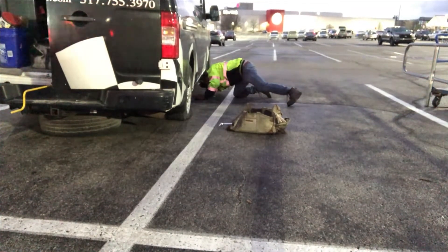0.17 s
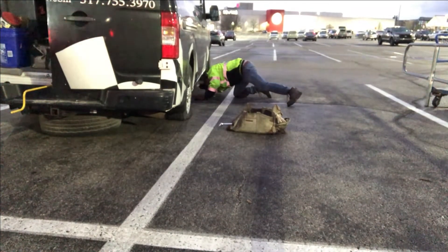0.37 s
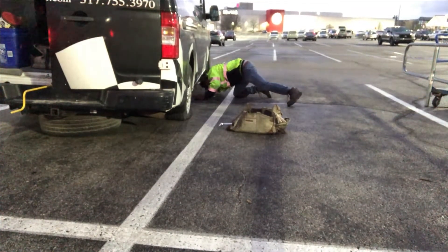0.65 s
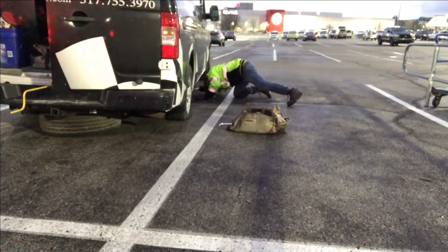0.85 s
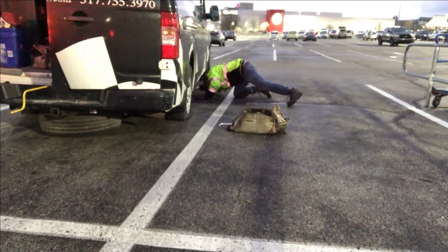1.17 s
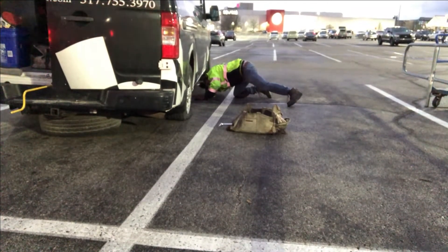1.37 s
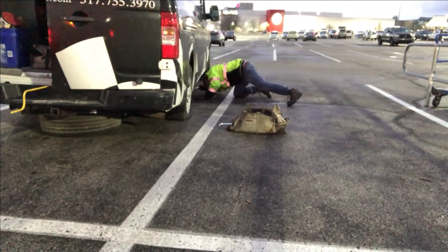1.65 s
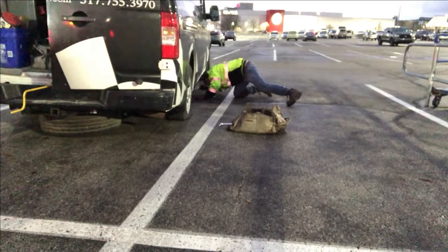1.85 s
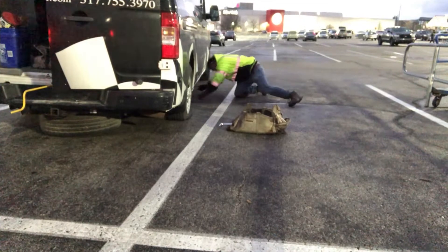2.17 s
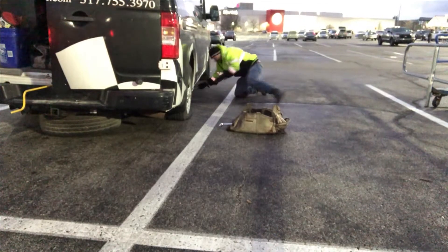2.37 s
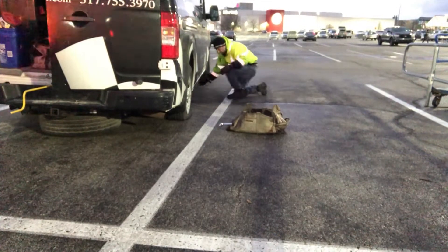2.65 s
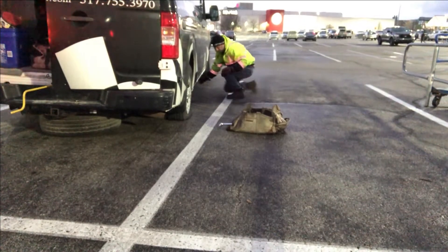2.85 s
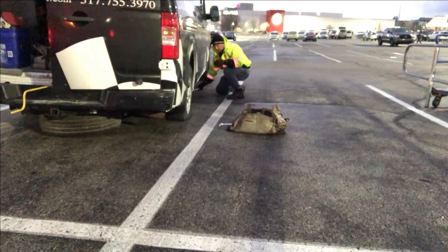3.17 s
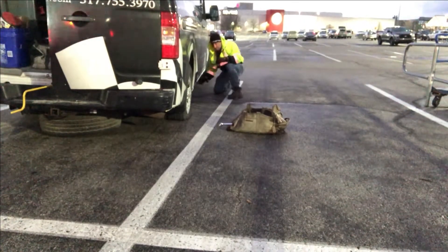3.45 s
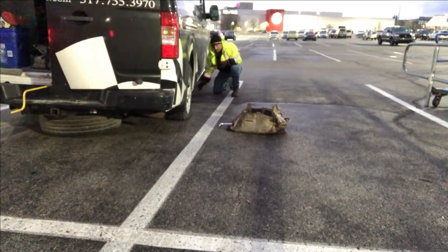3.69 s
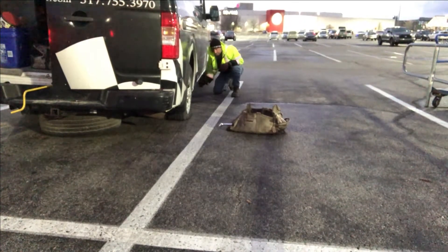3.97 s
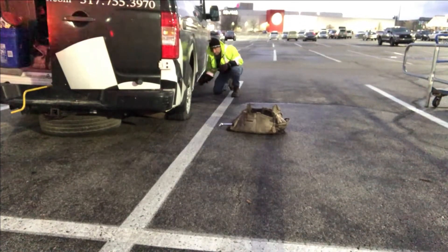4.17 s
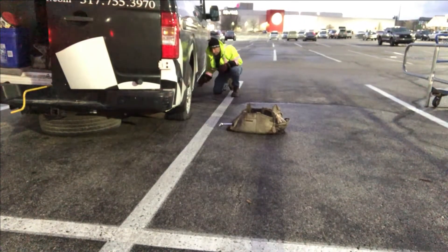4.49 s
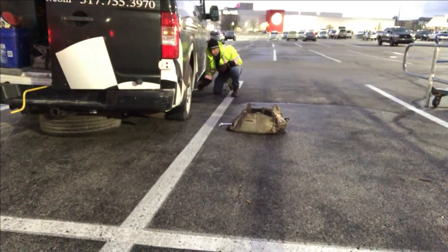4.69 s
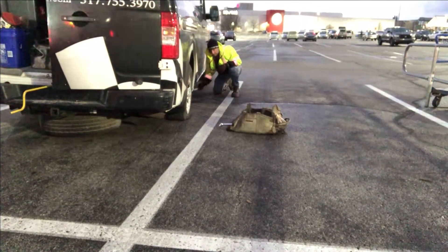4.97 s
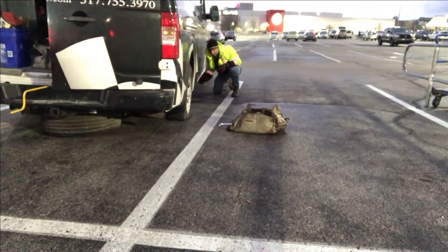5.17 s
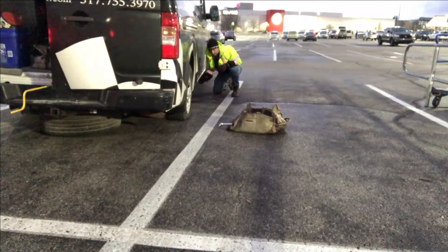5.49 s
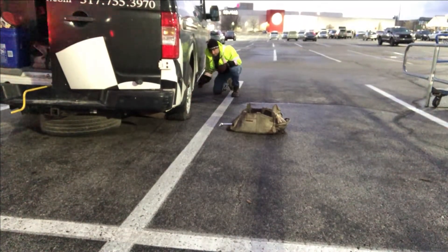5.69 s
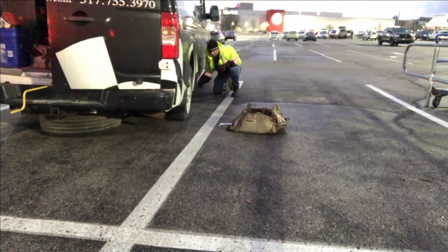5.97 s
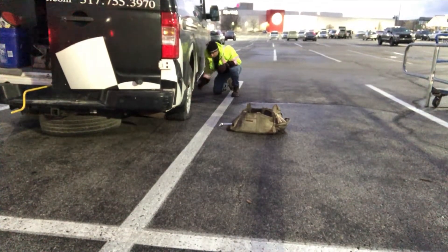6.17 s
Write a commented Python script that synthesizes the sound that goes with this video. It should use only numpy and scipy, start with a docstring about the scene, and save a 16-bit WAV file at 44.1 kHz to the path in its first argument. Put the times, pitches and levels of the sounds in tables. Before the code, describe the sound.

In an open parking lot, a hydraulic floor jack is pumped under a van. Quick light strokes scrape and clack the steel handle, with one loud thump near the start. Shoes scuff and clothes rustle amid a few clinks and knocks. Then heavy, rattling knocks come about three a second. Wind rumbles on the microphone over faint traffic; the sound is left channel only, slightly overdriven, with brief dropouts.

```python
"""Open car park: a hydraulic floor jack is pumped under a van, over wind and distant traffic.
Quick idle strokes scrape and clack the steel handle. The worker shuffles into a crouch, then full
strokes knock the handle against its stop, three a second, ringing jack and van body.
One overdriven microphone feeds the left channel; the recorder stutters in short dropouts."""
import sys
import numpy as np
from scipy import signal
from scipy.fft import rfft, irfft, next_fast_len
from scipy.io import wavfile
from scipy.ndimage import uniform_filter1d

SR = 44100
rng = np.random.default_rng(int(sys.argv[2]) if len(sys.argv) > 2 else 0)


def wav_record(signal):
    """Record a signal, one row per channel, as 16-bit PCM in the file named by sys.argv[1]."""
    frames = np.transpose(np.atleast_2d(signal))
    bounded = np.clip(frames, -1, 1)
    # unit amplitude maps onto the largest positive 16-bit level
    quanta = np.round(bounded * 32767).astype(np.int16)
    wavfile.write(sys.argv[1], SR, quanta)


N = 279153


def amp(db):
    """Decibels to gain."""
    return 10 ** (np.asarray(db) / 20)


def unit(x):
    """Scale to rms 1."""
    return x / np.sqrt(np.mean(x ** 2) + 1e-20)


def along(points, hz):
    """Interpolate (freq_hz, value) points on a log axis."""
    freqs_hz, values = np.transpose(points)
    return np.interp(np.log(hz + 1), np.log(freqs_hz + 1), values)


def wobble(rate_hz):
    """Smooth random curve, rate_hz knots a second."""
    knots = rng.standard_normal(int(N * rate_hz / SR) + 4)
    fine = signal.resample_poly(knots, up=8, down=1)
    return np.interp(np.arange(N) * rate_hz / SR, np.arange(len(fine)) / 8, fine)


def filtered(x, response):
    """Apply the gain response(hz)."""
    n = x.shape[-1]
    padded = next_fast_len(n + 8192)
    return irfft(rfft(x, padded) * response(np.fft.rfftfreq(padded, 1 / SR)), padded)[..., :n]


def coloured(x, colour):
    """Shape by (freq_hz, level_db) points; rms 1."""
    return unit(filtered(x, lambda hz: amp(along(colour, hz))))


def noise(colour, size=N):
    """Coloured noise, rms 1."""
    return coloured(rng.standard_normal(size), colour)


def grit(rough_db):
    """Dense micro-impacts of uneven strength."""
    return rng.standard_normal(N) * amp(rough_db * wobble(400))


def dying(x, decay):
    """Fade each band by (freq_hz, t60_s) points."""
    hz, t, bands = signal.stft(x, SR, nperseg=256)
    fade = amp(-60 * t / along(decay, hz)[:, None])
    return signal.istft(bands * fade, SR, nperseg=256)[1][:len(x)]


def add(track, start_s, sound):
    """Mix sound into track at start_s."""
    i = round(start_s * SR)
    part = sound[max(-i, 0):N - i]
    track[max(i, 0):max(i, 0) + len(part)] += part


def wind():
    """Steady, lumpy rumble of air on the microphone."""
    # wind spectrum: freq_hz, level_db
    colour = [(15, 3), (40, 1), (100, -3), (165, -10), (250, -18.5), (400, -32), (1000, -68), (16000, -120)]
    return amp(-37.5 + 1.04 * wobble(1.6) + 1.5 * wobble(13)) * noise(colour)


def traffic():
    """Steady distant traffic hum, with the background louder at the start and around the scuffs."""
    # traffic spectrum: freq_hz, level_db
    colour = [(60, -3), (230, 1.5), (410, -3.5), (520, -3.5), (900, -7), (1500, -19), (2200, -24.5),
              (3100, -27), (4500, -33), (9000, -43), (16000, -62)]
    # background loudness: time_s, level_db
    contour = [(0, -46), (.6, -50), (1.1, -53.5), (2.6, -44), (3.8, -52), (6.33, -53)]
    level_db = np.interp(np.arange(N) / SR, *np.transpose(contour))
    return amp(level_db + 1.2 * wobble(3.88)) * noise(colour)


def car_park(x, echo_s, echo_db, tail_db, lowpass_hz):
    """A distant wall slaps back; parked cars scatter a faint tail."""
    # open-air decay: freq_hz, t60_s
    decay = [(100, 2), (700, 0.97), (3000, 0.73), (6000, .9), (14000, .5)]
    t = np.arange(SR) / SR
    tail = dying(rng.standard_normal(SR), decay)
    slap = rng.standard_normal(SR) * (t > echo_s) * np.exp(-abs(t - echo_s) / 0.0095)
    impulse = amp(tail_db) * tail / np.linalg.norm(tail) + amp(echo_db) * slap / np.linalg.norm(slap)
    reflected = signal.fftconvolve(x, impulse)[:N]
    return filtered(reflected, lambda hz: hz / np.hypot(hz, 400) / np.hypot(1, hz / lowpass_hz))


def dragged(pushes, colour, rough_db):
    """Gritty rubbing swells with each push, catching and letting go."""
    envelope, t = np.zeros(N), np.arange(SR) / SR - .5
    from_peak_s = np.hypot(t, 0.007) - 0.007  # rounds the peak
    for peak_s, level_db, rise_t60_s, fall_t60_s in pushes:
        t60_s = np.where(t < 0, rise_t60_s, fall_t60_s)
        add(envelope, peak_s - .5, amp(level_db - 60 * from_peak_s / t60_s))
    catching = unit(amp(2.8 * wobble(60)))
    return envelope * catching * coloured(grit(rough_db), colour)


def rustles():
    """Work clothes rub as the worker moves."""
    # cloth movements: peak_s, level_db, rise_t60_s
    moves = [(2.54, -46, 0.26), (2.735, -47.5, 0.07), (2.85, -53, 1.8), (3.6, -46, .25),
             (4.98, -57.5, 1.44), (6.05, -61.5, 0.45)]
    # cloth spectrum: freq_hz, level_db
    colour = [(200, -28), (900, 2.5), (2500, -1.5), (4600, -2.5), (6500, -11), (10000, -21), (16000, -39)]
    pushes = [(s, db, rise_t60_s, 1.15 * rise_t60_s) for s, db, rise_t60_s in moves]
    return dragged(pushes, colour, rough_db=0.5)


def scuffs(fall_t60_s=0.2):
    """Soles and knees drag dully over asphalt."""
    # drags: peak_s, level_db, rise_t60_s
    drags = [(2.02, -44, 0.64), (2.375, -44, 0.06), (2.413, -32.5, 0.07), (2.502, -39.5, 0.66),
             (2.598, -25.5, 0.13), (3.57, -31, .09)]
    # scuff spectrum: freq_hz, level_db
    colour = [(60, -6.5), (200, -5.5), (350, -1.5), (650, -5.5), (1000, -28.5), (2500, -25), (8000, -52.5),
              (16000, -65)]
    return dragged([(*drag, fall_t60_s) for drag in drags], colour, rough_db=4.5)


def weight_shifts(width_s=.007):
    """Weight lands on a foot or the handle: one deep pulse, no ring."""
    # pushes: peak_s, level_db
    pushes = [(2.338, -20.5), (2.388, -29), (4.223, -28)]
    out, u = np.zeros(N), (np.arange(SR // 5) / SR - .1) / width_s
    pulse = (1 - u * u) * np.exp(-u * u / 2)
    for peak_s, level_db in pushes:
        add(out, peak_s - .1, amp(level_db) * pulse)
    return out


def clinks(t60_s=0.13):
    """Loose linkage parts ring in short, rough notes."""
    # steel notes: start_s, pitch_hz, level_db
    notes = [(2.4, 3130, -30.5), (2.399, 3880, -31.5), (3.128, 1890, -28), (3.127, 2770, -30),
             (3.247, 2800, -32.5), (3.69, 2755, -37)]
    out, t = np.zeros(N), np.arange(SR // 4) / SR
    envelope = (1 - np.exp(-t / 0.0018)) * 1000 ** (-t / t60_s)
    for start_s, pitch_hz, level_db in notes:
        chatter_rad = 0.055 * np.cumsum(rng.standard_normal(len(t)))
        add(out, start_s, amp(level_db) * envelope * np.sin(2 * np.pi * pitch_hz * t + chatter_rad))
    return out


def chassis(force, sway_db=3, sway_hz=9):
    """The jack's steel frame rings; each mode swells and fades as the contact moves."""
    # frame modes before sharpening: pitch_hz, width_hz, level_db
    modes = [(602, 68, 0.5), (1235, 57, -2.5), (1632, 22, -3.5), (1721, 33, 1.5), (1960, 49, 0),
             (2106, 23, 1.5), (2780, 72, -2.5), (3086, 43, -1.5), (3700, 130, -12.5), (4430, 85, -6.5),
             (5850, 57, -13)]
    ring = np.zeros(N)
    for pitch_hz, width_hz, level_db in modes:
        def sharpened(hz):
            mode = amp(level_db) * 1j * hz * width_hz / (pitch_hz ** 2 - hz ** 2 + 1j * hz * width_hz)
            return mode * abs(mode) ** 0.42
        ring += filtered(force, sharpened) * amp(sway_db * wobble(sway_hz))
    return unit(ring)


def friction(contacts, colour, ring_db, rough_db, treble_t60_ratio):
    """Steel rubs on steel: each contact builds, then fades, treble first."""
    ring = chassis(grit(rough_db))
    direct = coloured(grit(rough_db), colour)
    rub = unit(direct + amp(ring_db) * ring)
    treble = filtered(rub, lambda hz: 1 - 1 / (1 + (hz / 3800) ** 4))
    body_gain, treble_gain, t = np.zeros(N), np.zeros(N), np.arange(SR // 2) / SR
    for start_s, level_db, rise_s, t60_s, treble_db in contacts:
        build = np.minimum(t / rise_s, 1) ** 0.48
        fade = 1000 ** (-np.maximum(t - rise_s, 0) / t60_s)
        add(body_gain, start_s, amp(level_db) * build * fade)
        add(treble_gain, start_s, amp(level_db + treble_db) * build * fade ** (1 / treble_t60_ratio))
    return body_gain * (rub - treble) + treble_gain * treble


def idle_strokes(tap_rise_s=0.0021):
    """The handle taps, catches and slides; the linkage clacks at the turn or when jolted."""
    # handle strokes: slide_s, slide_db, take_up_s, travel_s, clack_db
    strokes = [(0.05, -28, 0.059, 0.09, -23.5), (.484, -31, 0.082, .074, -23.5),
               (.872, -29, 0.074, .082, -27), (1.25, -28.5, 0.06, 0.082, -25.5),
               (1.6, -26, 0.048, 0.082, -26.5), (1.916, -25.5, 0.0498, .093, -27),
               (3.551, -31.5, 0.041, 0.14, -36), (4.081, -39.5, 0.097, 0.056, -46.5)]
    # stray taps of the handle in its socket: start_s, level_db, t60_s
    stray_taps = [(.396, -45, 0.081), (2.063, -21.5, .028), (3.362, -44, .15), (4.031, -39, 0.25),
                  (4.666, -40, 0.18)]
    # linkage jolts as the grip changes: start_s, level_db, rise_s
    jolts = [(2.159, -39.5, 0.014), (2.4, -30.5, 0.0059), (2.495, -43.5, .03), (2.712, -35.5, 0.029),
             (3.125, -26.5, 0.0057), (3.246, -33.5, .005), (3.776, -35, 0.0038), (5.892, -45.5, 0.0035),
             (6.176, -42, .003)]
    # tap spectrum: freq_hz, level_db
    tap_colour = [(100, -16), (600, 7), (1400, 1), (2100, -9), (3200, -15.5), (5000, -34), (16000, -60)]
    # slide spectrum: freq_hz, level_db
    slide_colour = [(100, -6), (300, -3), (650, -2.5), (900, -1.5), (1800, 1), (3000, -5.5), (4500, -10.5),
                    (7000, -21.5), (10000, -32), (16000, -54)]
    # clack spectrum: freq_hz, level_db
    clack_colour = [(100, -21), (400, -7), (620, 3.5), (900, -2), (1800, -0.5), (3000, -3), (4700, -8.5),
                    (7000, -20.5), (11500, -26.5), (13000, -44), (16000, -52)]
    # contacts: start_s, level_db, rise_s, t60_s, treble_db
    taps = [(s, db, tap_rise_s, t60_s, 0) for s, db, t60_s in stray_taps]
    clacks = [(s, db, rise_s, 0.199, -3.5) for s, db, rise_s in jolts]
    slides = []
    for slide_s, slide_db, take_up_s, travel_s, clack_db in strokes:
        taps.append((slide_s - take_up_s, slide_db - 13.5, tap_rise_s, 0.21, 0))
        slides.append((slide_s - take_up_s / 2, slide_db - 8, 0.021, 0.37, 0))  # the catch
        slides.append((slide_s, slide_db, 0.014, 0.23, 1))
        clacks.append((slide_s + travel_s, clack_db, 0.0071, 0.17, 1))
    return (friction(taps, tap_colour, ring_db=-10.5, rough_db=1.5, treble_t60_ratio=0.73)
            + friction(slides, slide_colour, ring_db=-1.5, rough_db=2.6, treble_t60_ratio=0.74)
            + friction(clacks, clack_colour, ring_db=-0.5, rough_db=2.6, treble_t60_ratio=0.78))


def struck(modes, t, spread_db):
    """Damped modes, their levels varying from blow to blow."""
    partials = [amp(db) * 1000 ** (-t / t60_s) * np.sin(2 * np.pi * hz * t) for hz, db, t60_s in modes]
    return amp(spread_db * rng.standard_normal(len(modes))) @ np.array(partials)


def rattle(t, hardness_db):
    """Loose parts crack and shake; harder blows are brighter and louder."""
    # loose-part spectrum: freq_hz, level_db
    colour = [(40, -7.5), (130, 2.5), (280, 5), (550, -7.5), (900, -8), (1500, -14.5), (2000, -20.5),
              (2900, -21.5), (4200, -32.5), (6500, -34), (10000, -44), (16000, -46.5)]
    # loose-part decay: freq_hz, t60_s
    decay = [(100, .17), (500, 0.17), (2000, 0.13), (6000, 0.092), (14000, 0.057)]
    attack = np.sin(np.pi / 2 * np.minimum(t / 0.00057, 1)) ** 2
    crack = 1 + amp(-0.5) * np.exp(-t / 0.0074)
    shake = dying(noise(colour, len(t)), decay) * attack * crack
    cutoff_hz = min(9000 * 2 ** (hardness_db / 3), SR / 3)
    return amp(hardness_db - 9.5) * signal.lfilter(*signal.butter(1, cutoff_hz, fs=SR), shake)


def knocks():
    """The handle hits its stop: the body booms, loose parts rattle, the tube pings."""
    # blows: start_s, level_db, hardness_db, ping_db
    blows = [(0.257, -2.5, -2.5, -11.5), (2.7782, -8.5, -1.5, -2), (2.811, -15, 0, 3),
             (2.83, -20, 2.5, 5.5), (3.436, -7.5, -9.5, -31), (4.2409, -2, 0, 3), (4.8685, -.5, -0.5, 0.5),
             (5.1803, -2.5, 0, -2.5), (5.492, -2, -2, -6.5), (5.8, -5, -1.5, 0.5), (6.1, -9.5, -2.5, -11.5)]
    # jack and van body modes: pitch_hz, level_db, t60_s
    body_modes = [(105.4, -24, 0.16), (133, -10.5, 0.16), (160.1, -1, .13), (223, -7, 0.12),
                  (248.7, -11, 0.11), (289.1, -6.5, 0.096), (332.4, -9.5, 0.15), (386.3, -12, 0.13),
                  (410.6, -15.5, .15), (473, -22.5, 0.15), (589.5, -20, .13), (647, -20.5, .12),
                  (768.5, -22, 0.15), (854, -19.5, .11), (939, -27, 0.15), (1108, -30.5, 0.17),
                  (1253, -39, 0.15), (1565, -26, 0.089)]
    # handle tube modes: pitch_hz, level_db, t60_s
    tube_modes = [(4843, -31.5, 0.13), (5180, -40.5, 0.15), (6300, -40.5, 0.11)]
    out, t = np.zeros(N), np.arange(SR // 4) / SR
    for start_s, level_db, hardness_db, ping_db in blows:
        body = -struck(body_modes, t, spread_db=1.3) * (1 - np.exp(-t / .0015))
        low = signal.lfilter(*signal.butter(1, 450, fs=SR), body)
        boom = amp(2.5) * (low + amp(hardness_db) * (body - low))  # soft blows lose upper modes
        shake = rattle(t, hardness_db)
        ping = amp(ping_db) * struck(tube_modes, t, spread_db=1.5)
        add(out, start_s, amp(level_db) * (boom + shake + ping))
    return out


def scene():
    """Jack, worker, reflections and background, left channel only."""
    near = knocks() + idle_strokes() + clinks() + scuffs() + rustles() + weight_shifts()
    reflections = car_park(near, echo_s=.105, echo_db=-25.5, tail_db=-24.5, lowpass_hz=6000)
    left = near + reflections + wind() + traffic()
    return np.array([left, np.zeros(N)])


def dropouts(x, block_s=.005, quiet_db=-31, gap_s=.0063):
    """The recorder cuts out briefly with a click: at set times, and at random when quiet."""
    # timed gaps: start_s, length_s, click_db
    timed_gaps = [(2.6574, 0.0076, -25.5), (2.971, 0.0065, -25.5), (2.985, .0245, -53),
                  (3.1635, .0065, -50), (3.2606, 0.0078, -50), (3.4015, .0155, -50), (3.4219, .0125, -62),
                  (4.3502, .0055, -23.5), (4.8894, 0.00578, -34), (4.9355, .0145, -34),
                  (5.214, 0.0063, -28), (5.2547, 0.0061, -27.5), (5.5143, 0.0065, -41),
                  (5.794, 0.0058, -23), (5.8168, 0.00545, -45)]
    # chance of losing a quiet block: time_s, probability
    loss_chance = [(2, 0), (2.6, .15), (3, .22), (3.8, 0.12), (4.2, 0.043), (5.1, .24), (6.33, 0.067)]
    block = (np.arange(N) / SR / block_s).astype(int)
    block_rms = np.sqrt(np.bincount(block, x[0] ** 2) / np.bincount(block))
    starts_s = np.arange(len(block_rms)) * block_s
    chance = np.interp(starts_s, *np.transpose(loss_chance))
    lost = (rng.random(len(starts_s)) < chance) & (block_rms < amp(quiet_db))
    clicks_db = -53 + 7 * rng.standard_normal(len(starts_s))
    random_gaps = [(s, gap_s, db) for s, db in zip(starts_s[lost], clicks_db[lost])]
    gate, clicks = np.ones(N), np.zeros((2, N))
    click = np.exp(-np.arange(SR // 500) / SR / .00006)
    for start_s, length_s, click_db in list(timed_gaps) + random_gaps:
        gate[round(start_s * SR):round((start_s + length_s) * SR)] = 0
        add(clicks[0], start_s, amp(click_db) * click)
    rumble = signal.lfilter(*signal.butter(2, 55, fs=SR), x)  # carries on through the gaps
    return rumble + (x - rumble) * uniform_filter1d(gate, size=12) + clicks


def record(dry):
    """Asymmetric clipping on the knocks, dropouts, 16.5 kHz band limit."""
    clipped = np.clip(dry, -.71, .95)
    return filtered(dropouts(clipped), lambda hz: hz < 16500)


dry = scene()
out = record(dry)
wav_record(out)
```